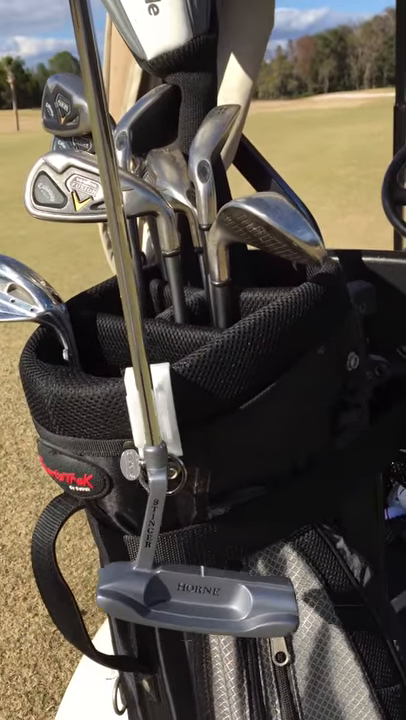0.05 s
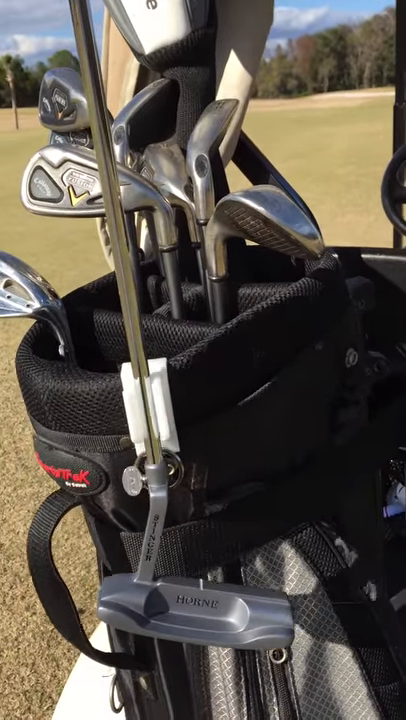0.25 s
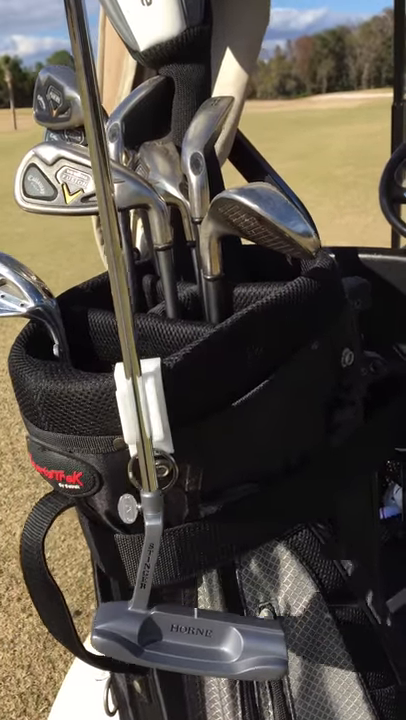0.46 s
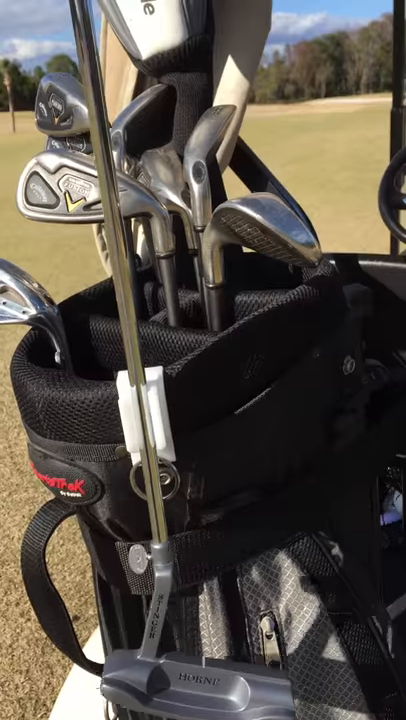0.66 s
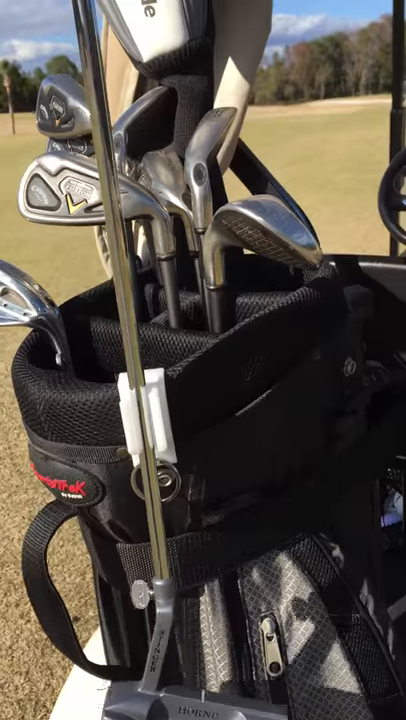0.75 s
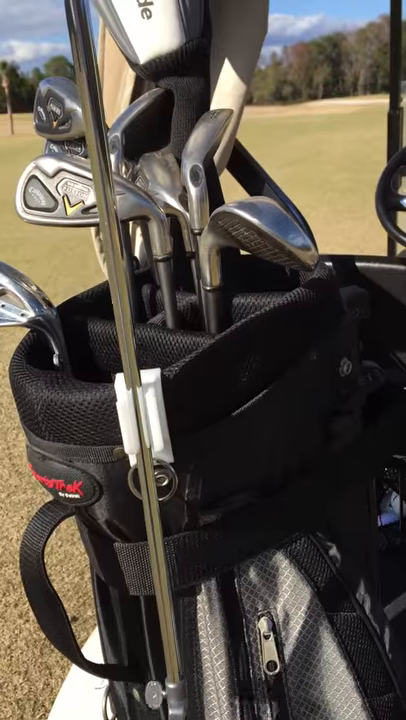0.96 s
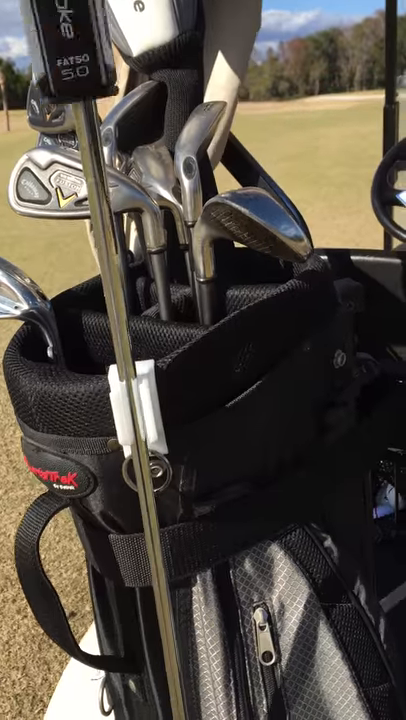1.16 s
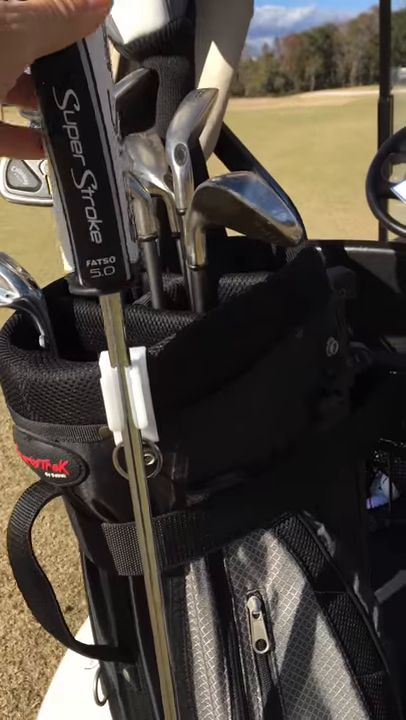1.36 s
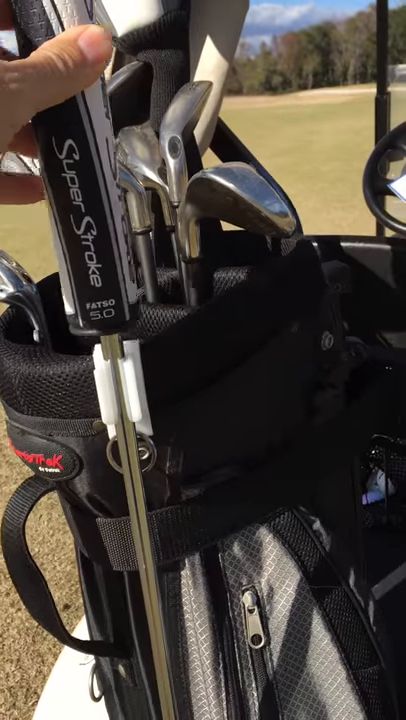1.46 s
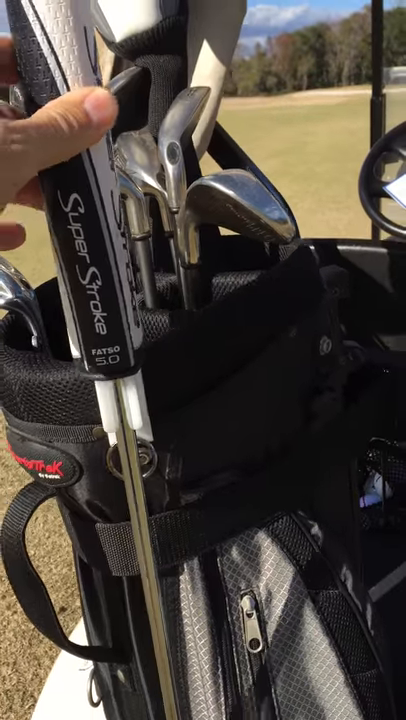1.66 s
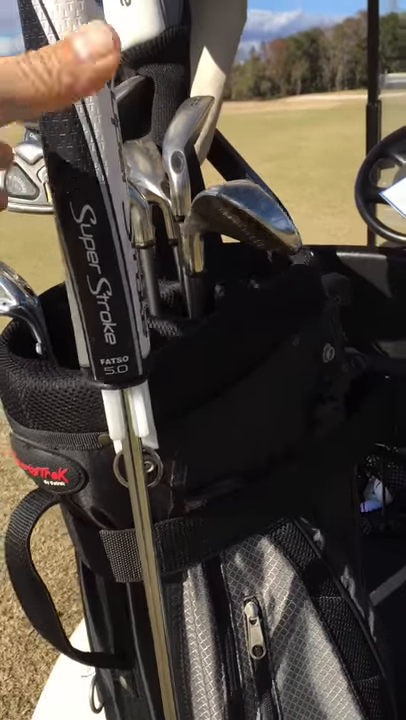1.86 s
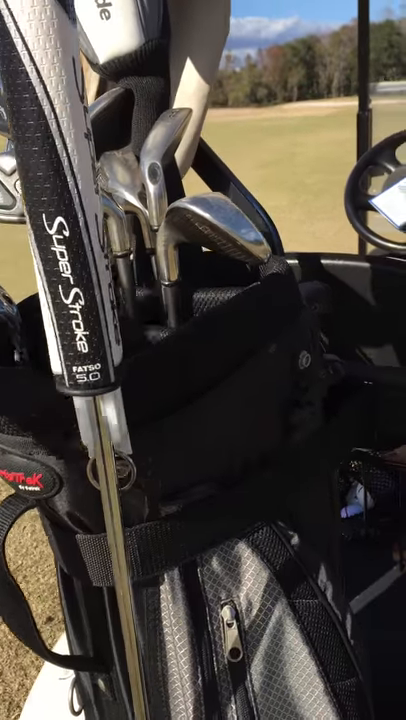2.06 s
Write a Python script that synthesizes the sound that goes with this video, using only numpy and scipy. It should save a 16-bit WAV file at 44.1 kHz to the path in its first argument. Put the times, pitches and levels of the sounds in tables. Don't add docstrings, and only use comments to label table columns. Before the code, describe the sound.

Hard clicks and knocks as a metal golf club is pushed down through a plastic holder

```python
import sys
import numpy as np
from scipy import signal
from scipy.fft import rfft, irfft
from scipy.io import wavfile
from scipy.ndimage import uniform_filter1d

SR = 44100
rng = np.random.default_rng(int(sys.argv[2]) if len(sys.argv) > 2 else 0)


def volts_from_db(level):
    exponent = np.asarray(level, float) / 20
    return 10 ** exponent


def log_audio(samples):
    frames = np.atleast_2d(samples).T
    limited = np.clip(frames, -1, 1)
    pcm = np.round(limited * 32767).astype(np.int16)
    wavfile.write(sys.argv[1], SR, pcm)


N = 92610

# pitch_hz, level_db, t60_s (time to fade by 60 dB)
HOLDER = [(272, -2, 0.12), (382.6, 4.5, 0.059), (550, -15, 0.084), (742, -8, 0.11), (1066, -3, 0.05),
          (1460, -1, 0.029), (1682, -10.5, 0.082), (2274, -4.5, 0.057), (2810, -2, 0.024),
          (3900, -10, 0.09), (4290, -2, 0.13), (5340, -2, 0.0082), (6720, -6.5, 0.029)]
# pitch_hz, level_db, t60_s
GRIP = [(372, -10.5, 0.068), (677, -3, 0.065), (900, 8, 0.051), (1230, 1, 0.023), (1374, 9, 0.04),
        (1612, -3, 0.043), (2800, -19.5, 0.057), (3900, -2, 0.039), (4360, -12, 0.038)]
STRIKE_RISE_S = 0.0001


def rms_one(x):
    return x / np.sqrt(np.mean(x ** 2) + 1e-30)


def in_time(rows):
    s, *columns = np.transpose(rows)
    return [np.interp(np.arange(N) / SR, s, column) for column in columns]


def cut(x, hz, kind, order=2):
    return signal.sosfilt(signal.butter(order, hz, kind, fs=SR, output="sos"), x)


def add(out, s, sound):
    i = int(s * SR)
    out[i:i + len(sound)] += sound[:N - i]


def rings(hz, level_db, t60, phase, rise_s, size=SR // 8):
    t = np.arange(size) / SR
    hz, level_db, t60, phase = (np.asarray(v)[:, None] for v in (hz, level_db, t60, phase))
    swell = 1 - np.exp(-t / (rise_s + 0.21 / hz))
    fade = volts_from_db(level_db - 60 * t / t60)
    return (fade * swell * np.sin(2 * np.pi * (hz * t + phase))).sum(axis=0)


def air():
    # pitch_hz, level_db
    color = [(59, -12.5), (100, -3.5), (229, -12), (502, -30.5), (801, -23), (910, -30.5), (1080, -24),
             (4290, -29), (16000, -38.5)]
    hz, level_db = np.transpose(color)
    f = np.maximum(np.fft.rfftfreq(N, 1 / SR), 1)
    shape = volts_from_db(np.interp(np.log(f), np.log(hz), level_db, left=-40, right=level_db[-1]))
    return volts_from_db(-69.5) * rms_one(irfft(rfft(rng.standard_normal(N)) * shape, N))


def wind():
    # time_s, level_db
    gusts = [(0.0, -63.5), (0.06, -48.5), (0.13, -71), (0.18, -54.5), (0.51, -52), (0.55, -67),
             (0.61, -50.5), (0.66, -70), (0.75, -51), (0.98, -66), (1.17, -60), (1.34, -68), (1.41, -50.5),
             (1.45, -64), (1.78, -51.5), (2.0, -65.5), (2.03, -47.5), (2.1, -60.5)]
    low = cut(rng.standard_normal(N + SR), 41, "high", order=3)
    low = cut(low, 83.8, "low")[SR:]
    low = low / np.sqrt(uniform_filter1d(low ** 2, size=3500) + 1e-12)
    lumps = rms_one(cut(rng.standard_normal(N + SR), 3.02, "low")[SR:])
    return volts_from_db(-2 + in_time(gusts)[0] + 1.45 * lumps) * rms_one(low)


def swishes():
    # center_s, length_s, level_db, lowest_hz
    brushes = [
        (1.776, 0.0056, -63.5, 10100),
        (1.934, 0.016, -69, 8300),
    ]
    # center_s, length_s, level_db, lowest_hz
    whistle = (1.455, 0.03, -79, 11200)
    t, hiss = np.arange(N) / SR, rng.standard_normal(N)
    s, length_s, level_db, hz = whistle
    narrow = rms_one(cut(hiss, [hz, hz * 1.12], "band"))
    out = volts_from_db(level_db) * np.exp(-((t - s) / length_s) ** 2) * narrow
    for s, length_s, level_db, hz in brushes:
        puff = np.exp(-((t - s) / length_s) ** 2)
        out += volts_from_db(level_db) * puff * rms_one(cut(hiss, hz, "high", order=4))
    return out


def bag():
    # start_s, level_db, pitch_hz
    thumps = [
        (0.052, -50, 61.7),
        (0.232, -45.5, 81),
        (0.412, -36.5, 108),
        (0.598, -40.5, 67),
        (1.408, -48, 62),
        (1.539, -40.5, 76),
        (1.695, -38.5, 68.6),
        (1.897, -46.5, 53.6),
        (2.026, -45.5, 108.6),
    ]
    out, t = np.zeros(N), np.arange(SR // 4) / SR
    for s, level_db, hz in thumps:
        fade = volts_from_db(level_db - 60 * t * hz / 10.8)
        swell = 1 - np.exp(-t / 0.0053)
        add(out, s, fade * swell * np.sin(2 * np.pi * hz * t))
    return out


def squeal():
    from_s, to_s = 0.04, 0.18
    pitch_hz, width_hz = 4380, 470
    swell_db = in_time([(from_s - .01, -60), (from_s, -17), (to_s - .01, 0), (to_s, -6), (to_s + .005, -60)])[0]
    band = [pitch_hz - width_hz / 2, pitch_hz + width_hz / 2]
    return volts_from_db(-70.5 + swell_db) * rms_one(cut(rng.standard_normal(N), band, "band"))


def rub():
    # time_s, level_db, grit_db (hiss against ringing)
    pressure = [(0, -80.5, -15), (.09, -70, -28), (.17, -62.5, -10), (.26, -68.5, 0), (.3, -115, -12),
                (.42, -78, -16), (.46, -47, -22), (.49, -67, -1.5), (.55, -80, 5), (.69, -76.5, -6),
                (.8, -101, -21), (1.35, -78, 5), (1.44, -76, 6.5), (1.68, -91.5, 11), (1.72, -52, -4),
                (1.78, -54.5, -15), (1.84, -61.5, -20), (1.88, -86, -15)]
    slips_per_s, spread_db = 4500, 3.5
    happens = rng.random(N) < slips_per_s / SR
    size = volts_from_db(spread_db * np.minimum(rng.exponential(1, N), 4))
    grains = happens * size * rng.choice([-1, 1], N)
    hz, mode_db, t60 = np.transpose(HOLDER[2:] + GRIP[2:5])
    tilted_db = mode_db - 7 * np.log2(hz / 1000)
    ring = rings(hz, tilted_db, 0.13 * t60, rng.random(len(hz)), 0)
    body = rms_one(signal.fftconvolve(grains, ring)[:N])
    hiss = volts_from_db(-8) * rms_one(cut(grains, [1800, 13000], "band"))
    level_db, grit_db = in_time(pressure)
    return volts_from_db(level_db) * (body + volts_from_db(grit_db) * hiss)


def pings():
    # start_s, level_db, pitch_hz, t60_s
    notes_alone = [(0.2271, -31, 1078, 0.027), (.2263, -29, 5450, 0.0062), (.2265, -47, 3036, 0.042),
                   (.2272, -47.5, 4410, .022), (.2265, -43, 1680, 0.026), (.2263, -43.5, 11250, .006),
                   (.1855, -49, 5040, .01), (.4076, -21.5, 4440, 0.0051), (.4077, -28, 6800, 0.0063),
                   (.408, -28.5, 1650, 0.011), (.4078, -39, 12000, .006), (.4085, -32, 2820, 0.021),
                   (.4085, -41, 3760, 0.031), (.581, -36, 6560, 0.01), (.5805, -43, 1710, 0.04),
                   (.581, -49, 9080, 0.011), (.5802, -36, 2830, 0.018), (.58, -42.5, 4290, 0.018),
                   (2.0495, -45, 1790, 0.0056), (.367, -50.5, 4560, 0.02), (0.582, -32, 384, 0.048),
                   (.584, -43.5, 272, 0.099), (.4095, -31.5, 387, 0.048), (.414, -37.5, 272, 0.11),
                   (2.05, -35, 616, 0.01), (2.0495, -43.5, 1270, 0.013), (2.0497, -40.5, 2900, 0.0036),
                   (2.052, -43, 176, 0.053)]
    # start_s, level_db, pitch_hz, t60_s
    ticks = [(.4311, -46, 5300, .005), (.4445, -55, 7940, .008), (.4447, -57, 9700, .008),
             (.449, -45, 3500, .01), (.4512, -44, 9150, .008), (.4514, -46, 4400, .01),
             (0.452, -39, 1360, 0.026), (.4568, -39.5, 935, 0.029), (.4612, -41, 6200, .01),
             (.4642, -51, 6300, .01), (.4685, -57, 8900, .008), (.477, -54, 9000, .01),
             (.48, -50, 2950, .01), (1.148, -66, 15000, 0.018), (1.158, -67.5, 8450, 0.025),
             (1.224, -67, 8000, 0.016), (1.4089, -50, 4580, 0.014), (1.464, -54.5, 9130, 0.012),
             (1.4645, -60, 5000, .02), (1.7014, -40.5, 3040, .008), (1.7046, -53, 4700, 0.0057),
             (1.7048, -51, 7500, .008), (1.7143, -44, 6600, 0.0078), (1.7145, -50, 8000, 0.0056),
             (1.715, -24.5, 1710, 0.0071), (1.72, -44, 2800, .01), (1.7272, -56, 8000, 0.0088),
             (1.7358, -54, 7600, 0.0092), (1.737, -42, 2000, .008), (1.7482, -35.5, 1530, 0.0088),
             (1.7522, -41, 1610, 0.0089), (1.7682, -48, 4000, 0.0091), (1.7706, -54, 9400, .008),
             (1.707, -35.5, 233, .07), (1.7742, -43, 3180, 0.0083)]
    out = np.zeros(N)
    for s, level_db, hz, t60 in notes_alone + ticks:
        add(out, s, rings([hz], [level_db], [t60], [0], STRIKE_RISE_S))
    return out


def blows(rows, body, crack_db, rise_s, point_db, low_hz, cut_hz, crack_s, seated_damp=1):
    out, (hz, mode_db, t60) = np.zeros(N), np.transpose(body)
    luck, spread = rng.random((len(rows), 3, 120)), rng.standard_normal((len(rows), 16))
    lingers = np.arange(120) % 2
    t60 = np.where(hz > 3000, np.minimum(t60, 0.02), t60)
    octaves_up = np.log2(np.maximum(hz / 1000, 1))
    for (s, level_db, tilt_db, point_hz, low_db), u, g in zip(rows, luck, spread):
        g = g[:len(hz)]
        db = np.where(hz < 450, low_db - 3, tilt_db * octaves_up) + mode_db + 4 * g
        db -= 20 * (np.abs(hz / point_hz - 1) < .07)
        db = np.append(db, point_db + 0.45 * tilt_db * max(np.log2(point_hz / 1000), 0))
        all_hz = np.append(hz * (1 + .005 * g), point_hz)
        all_t60 = np.append(t60, max(41 / point_hz, 0.011))
        if s > 1.65:
            all_t60 = all_t60 * seated_damp
        sound = rings(all_hz, db, all_t60, u[1, :len(db)], rise_s)
        crowd = np.geomspace(low_hz, 15500, 120) * (1 + .03 * u[0])
        crowd_db = crack_db + (tilt_db + 0.23) * np.log2(np.maximum(crowd / 1000, 1))
        crowd_db = crowd_db - 10 * np.log10(1 + (crowd / cut_hz) ** 6) - 6.5 * lingers
        crowd_t60 = np.maximum(44.7 / crowd, crack_s) * 2.11 ** lingers
        sound[:2000] += rings(crowd, crowd_db, crowd_t60, .6 * u[2], 0.79 * rise_s, size=2000)
        total = np.sqrt(np.sum(volts_from_db(2 * db)) + np.sum(volts_from_db(2 * crowd_db)))
        add(out, s, volts_from_db(level_db) * sound / total)
    return out


def grip_taps():
    # start_s, level_db, tilt_db (brightness per octave), point_hz (note of the spot), low_db (level of
    # the grip's notes below 450 Hz)
    taps = [
        (1.547, -47, -27, 845, 0),
        (1.5645, -32.5, -1, 4060, 0),
        (1.657, -53, -28, 840, 0),
        (1.7995, -26.5, 3, 3900, 0.0045),
        (1.9195, -34, 1.5, 4080, 0),
        (1.956, -64, 7, 1900, 0),
    ]
    return blows(taps, GRIP, crack_db=-23.5, rise_s=0.0036, point_db=4.5, low_hz=1694, cut_hz=3250, crack_s=0.047)


def holder_knocks():
    # start_s, level_db, tilt_db (brightness per octave), point_hz (note of the spot), low_db
    knocks = [(.016, -44.5, -49, 1400, -7), (.112, -47.5, -6, 4630, 8), (.119, -54.5, -22, 810, 6),
              (.185, -42.5, -6, 6460, -5), (.2262, -36, -0.5, 9530, 4.5), (.2445, -51, -1, 6400, -7),
              (.367, -47, -6, 4540, 2), (.376, -56, -22, 900, -2), (.4076, -23, 1.5, 2026, -8.5),
              (.511, -59, -14, 1310, 11), (.5805, -29, -1, 2023, -14), (.603, -44.5, 2, 6570, 16),
              (.672, -59, -1.5, 1080, 8), (.680, -48.5, -6, 1910, 11), (.724, -60, -4, 1110, 8),
              (.906, -46, -8.5, 4270, 9.5), (1.131, -53.5, -1, 563, 13.5), (1.303, -58, 0.5, 550, 11),
              (1.409, -42, 0, 900, 11.5), (1.464, -47.5, -0.5, 5000, 10.5)]
    chatter = [(0.4309, -40.5, -1, 1780, -3), (.441, -42.5, 1, 3900, -2), (0.4511, -39.5, 3, 6300, 8),
               (0.452, -45.5, 2, 897, -3), (.461, -40, 3.5, 9630, -26), (.468, -43, 1.5, 5300, -10),
               (.477, -44, 1.5, 3100, -2), (1.688, -55, 4, 7000, -16), (1.7022, -34.5, 0, 216, 1.5),
               (1.7039, -37.5, -2, 352, -11), (1.709, -35, -3.5, 6500, -1), (1.714, -33.5, 1, 1740, -34),
               (1.7265, -46, -1, 1090, 5), (1.734, -43.5, 0.5, 1960, -8), (1.743, -46, -2, 1410, 0),
               (1.7475, -44.5, -1, 7900, 5), (1.752, -42, -5, 7700, 6), (1.7655, -46, 4.5, 7900, 11),
               (1.772, -43.5, -1.5, 3120, -3), (1.942, -57, 0, 12000, 9), (2.08, -58, -6, 1900, -6),
               (0.4102, -30.5, -2.5, 6280, 1.5)]
    return blows(knocks + chatter, HOLDER, crack_db=-8, rise_s=STRIKE_RISE_S, point_db=12, low_hz=499.3,
                 cut_hz=7370, crack_s=0.018, seated_damp=0.68)


def scene():
    background = air() + wind() + swishes()
    slide = bag() + rub() + squeal()
    strikes = pings() + grip_taps() + holder_knocks()
    return (background + slide + strikes)[None]


def low_pass(x):
    return signal.sosfilt(signal.butter(12, 16520, fs=SR, output="sos"), x)


def record(dry):
    low_cut = cut(dry, 24, "high", order=3)
    top_cut = signal.cheby2(12, 60, 16800, fs=SR, output="sos")
    return low_pass(signal.sosfilt(top_cut, low_cut))


dry = scene()
out = record(dry)
log_audio(out)
```